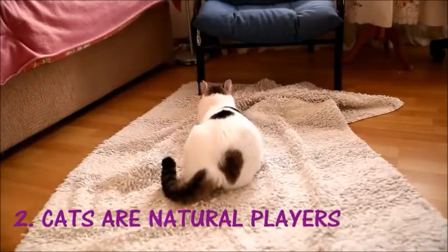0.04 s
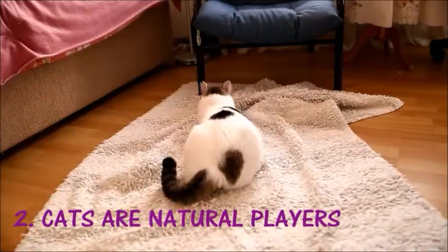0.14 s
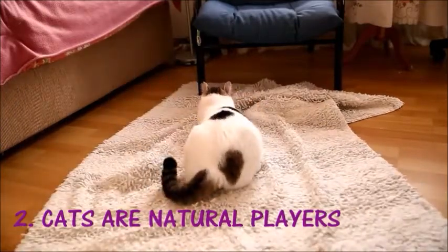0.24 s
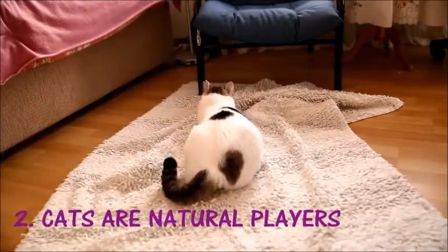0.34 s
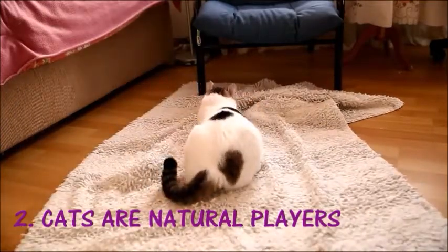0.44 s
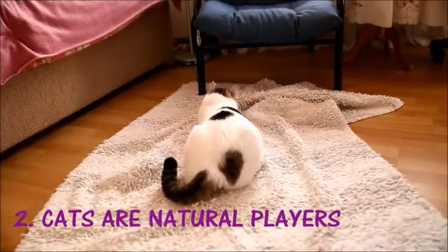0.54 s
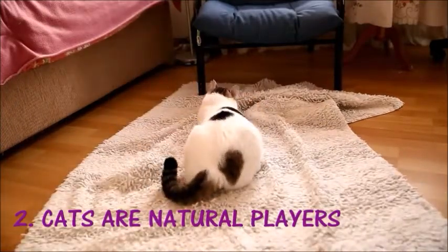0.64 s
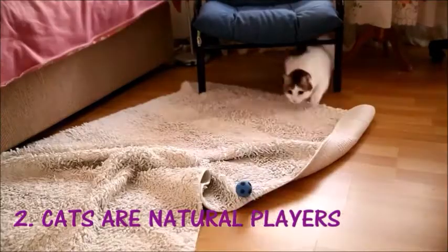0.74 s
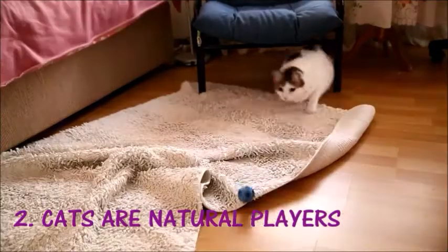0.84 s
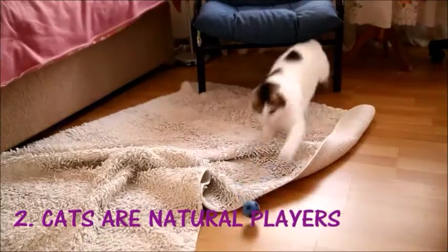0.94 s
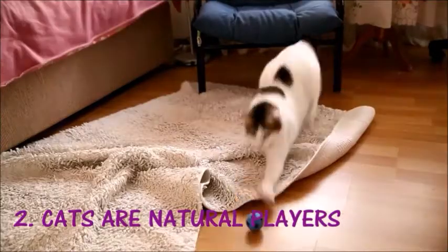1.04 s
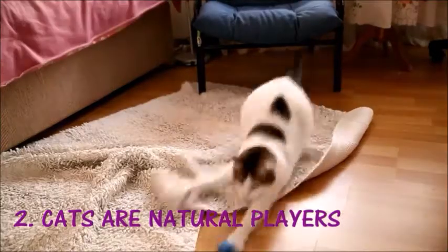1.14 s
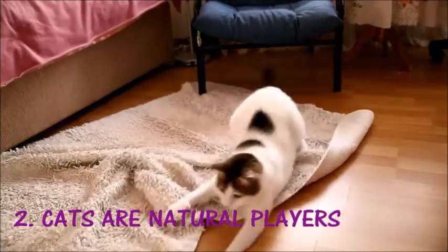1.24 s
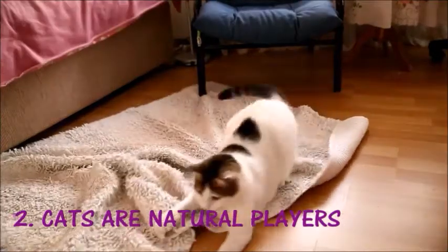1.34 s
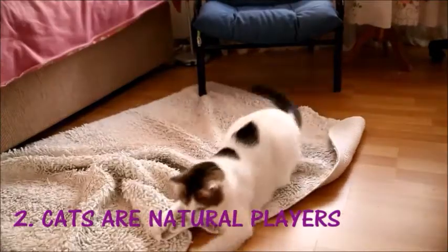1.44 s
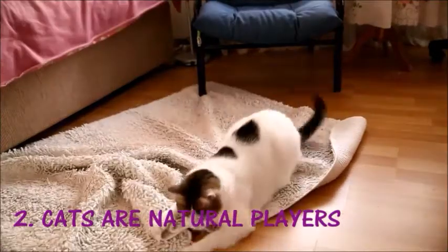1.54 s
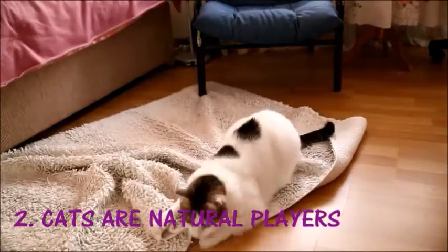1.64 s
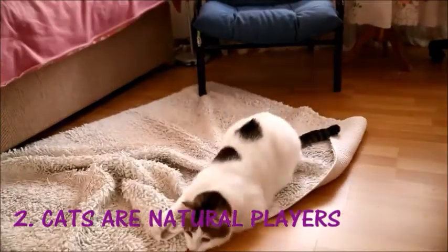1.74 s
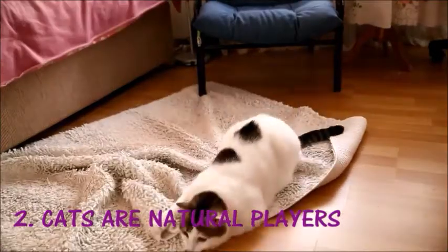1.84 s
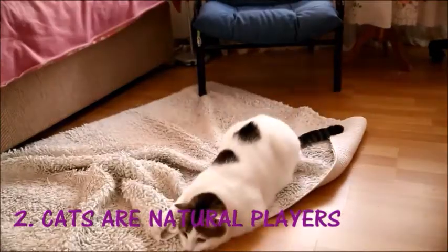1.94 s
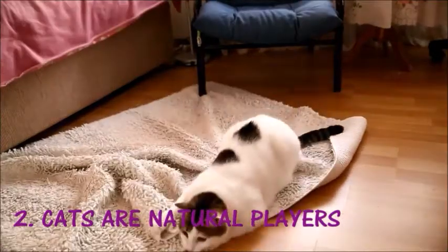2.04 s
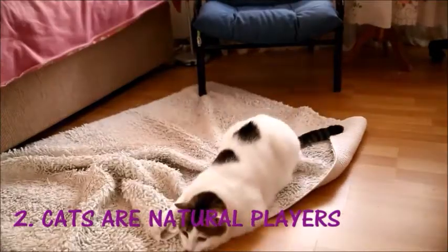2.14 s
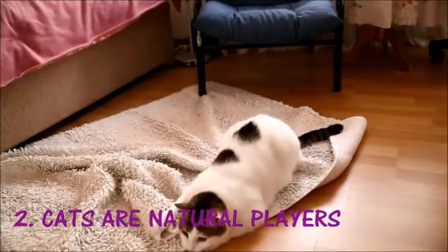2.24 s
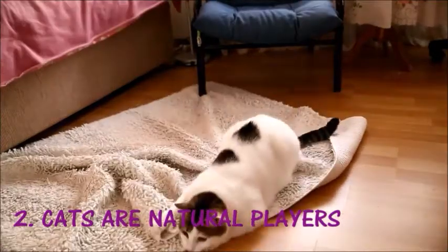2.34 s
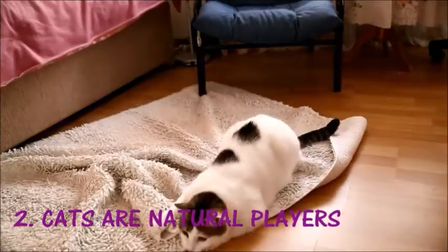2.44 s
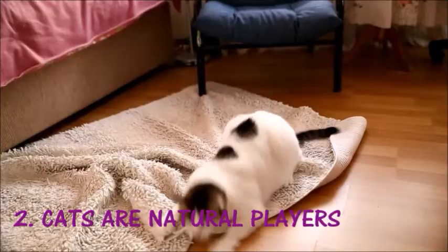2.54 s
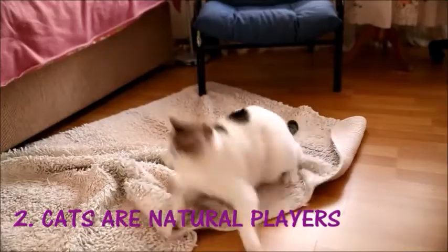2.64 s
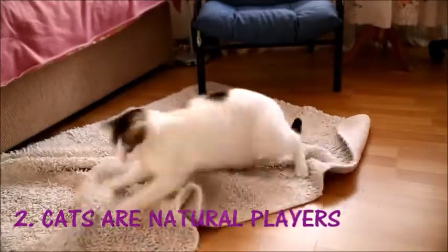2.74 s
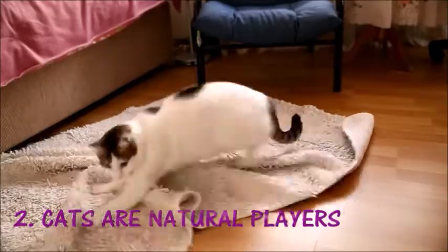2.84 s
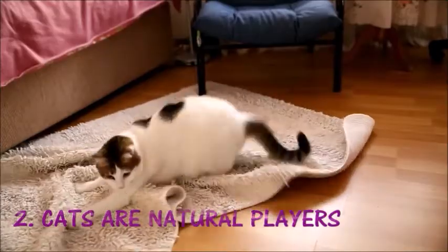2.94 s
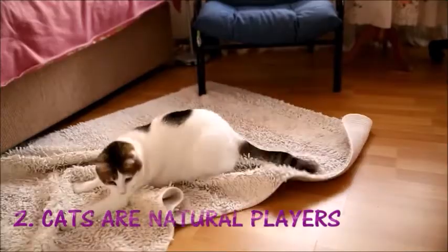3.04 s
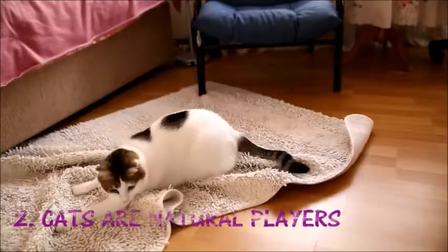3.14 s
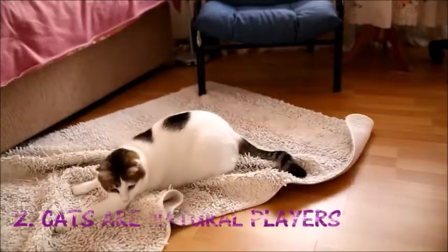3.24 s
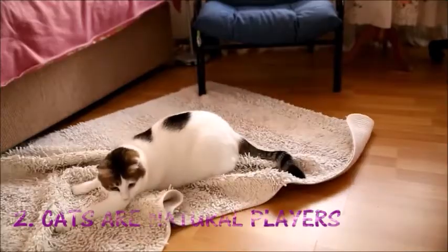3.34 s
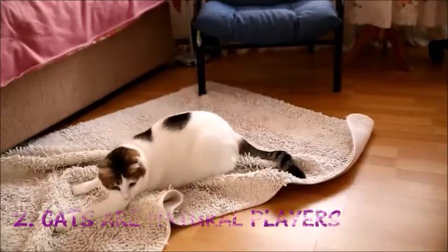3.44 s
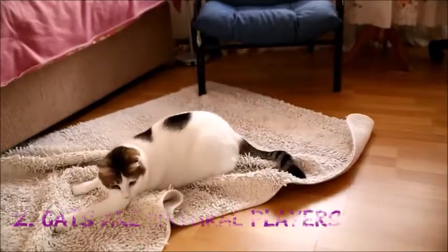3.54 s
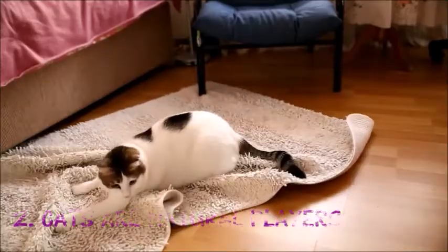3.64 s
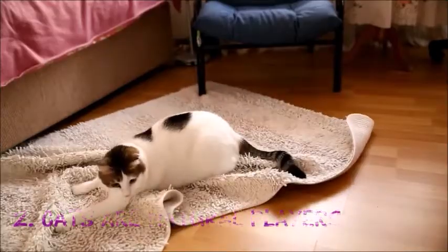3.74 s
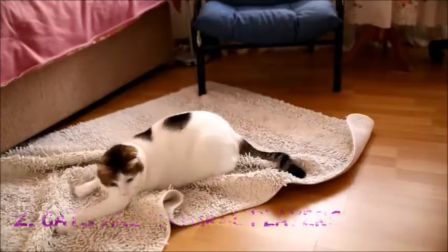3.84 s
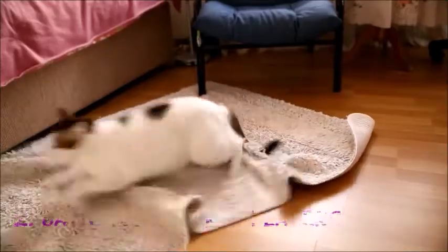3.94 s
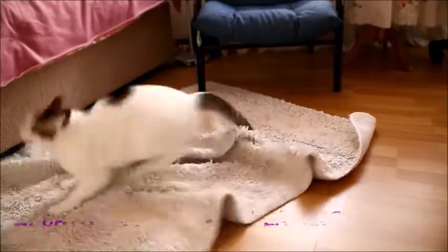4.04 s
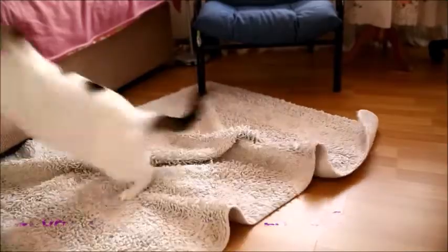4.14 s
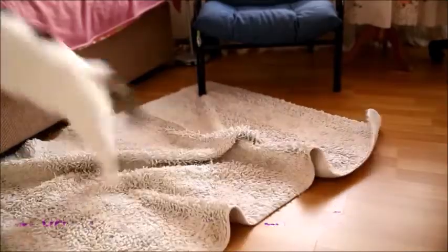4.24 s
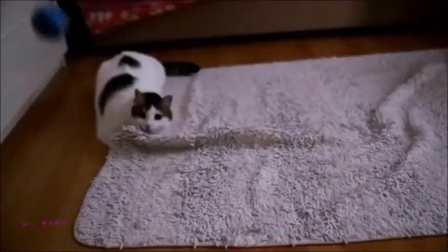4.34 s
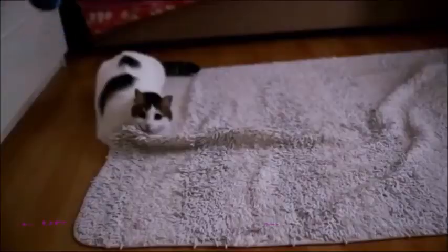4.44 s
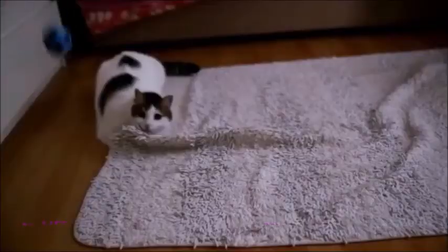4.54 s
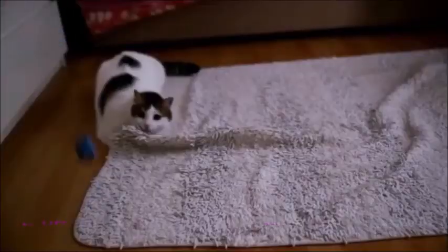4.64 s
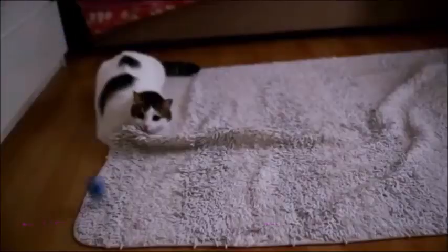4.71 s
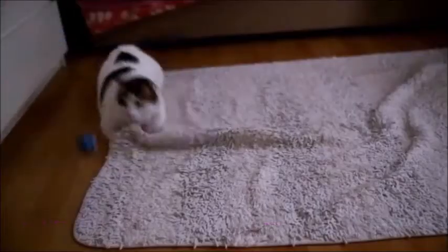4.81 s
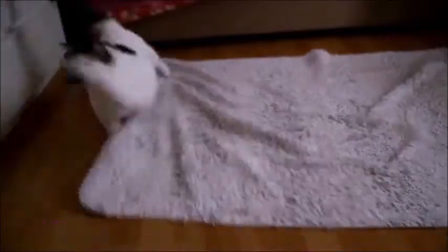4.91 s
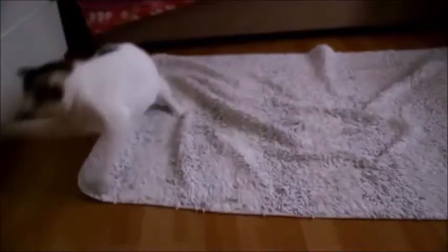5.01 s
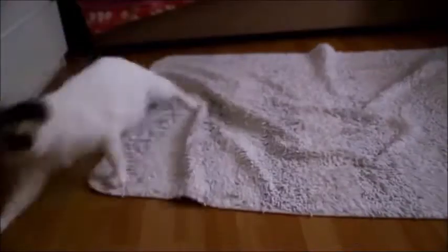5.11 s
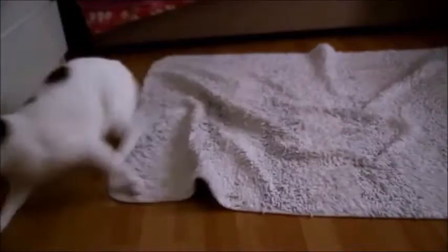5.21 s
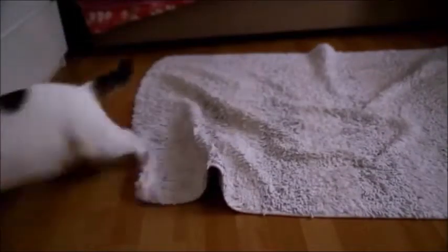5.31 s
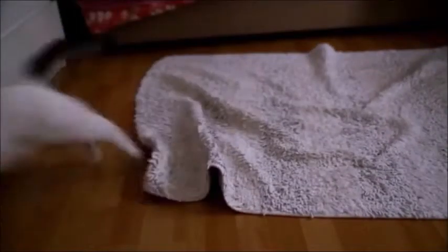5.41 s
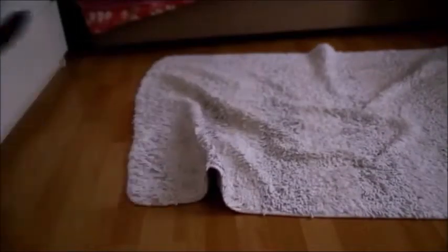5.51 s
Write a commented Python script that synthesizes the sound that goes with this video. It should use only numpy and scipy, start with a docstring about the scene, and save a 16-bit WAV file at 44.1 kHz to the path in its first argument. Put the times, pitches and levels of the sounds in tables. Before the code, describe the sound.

Light paw thuds and the rustle of a rug come from straight ahead as a cat leaps and scrabbles over a wooden floor. The movement thins out to a few steps, leaving a soft whir in the small room. Then the cat scrambles harder, its claws ripping at the pile and the rug sliding in quick swishes, ending with louder, ringing knocks on the boards.

```python
"""A cat pounces about on a shaggy rug over a wooden floor. Its paws thump the boards and set them
ringing, its claws tick, snag and zip in the pile, and the rug swishes as it is dragged and bunched.
A small room answers each step over a soft steady whir. The opening leap plays a second time,
set between two short silences. From 4.25 s all the cat's sounds are thinner, with less bass."""
import sys
import numpy as np
from scipy import signal
from scipy.fft import rfft, irfft, next_fast_len
from scipy.io import wavfile
from scipy.ndimage import uniform_filter1d, map_coordinates

SR = 44100
rng = np.random.default_rng(int(sys.argv[2]) if len(sys.argv) > 2 else 0)


def to_wav(s):
    """Save 16-bit WAV."""
    ch = np.atleast_2d(s).T  # columns
    pcm = np.round(np.clip(ch, -1, 1) * 32767)  # PCM
    wavfile.write(sys.argv[1], SR, pcm.astype(np.int16))


N = 245592
TIME = np.arange(N) / SR
AGE = np.arange(16384) / SR  # seconds since a blow

# The landings. Each row: start in seconds, board level in dB, board pitch in Hz, then thud, toes and
# room send in dB against the board (thud and toes before footfall's trims), and number of paws.
LANDINGS = [(0.4724, -41, 323, 0.5, 3, 3, 1), (0.5613, -34, 446, -14, -12, 3.5, 2),
            (0.8169, -39.5, 513, 1, -6, 6, 1), (0.865, -42, 340, -5, -3.5, 2.5, 2),
            (0.984, -40.5, 404, 0, -4, 4, 1), (1.062, -47, 520, -2.5, -6, 4.5, 1),
            (1.1711, -32, 550, -13, -10, 0.5, 1), (1.319, -38, 613, -18, -15, -3.5, 1),
            (1.3938, -34.5, 442, -22, -21, -3.5, 1), (1.439, -42, 445, -4, -14, 2.5, 1),
            (1.574, -44, 477, 4, -1, 5.5, 2), (1.673, -47.5, 416, -11, -2.5, 6, 1),
            (1.776, -41.5, 310, -15, -16, 1, 1), (1.827, -35.5, 537, -3.5, -6.5, 1, 1),
            (3.695, -34, 530, -15.5, -12.5, -4, 1), (3.698, -40, 164, -11, -31, -8, 1),
            (4.3382, -39, 630, -4, -3, 1, 1), (4.496, -42.5, 500, 3.5, -5, 8, 1),
            (4.599, -23.5, 596, -24, -2.5, 0.5, 3), (4.7082, -18.5, 650, -26, -8, 0.5, 1),
            (4.815, -23, 617, -27, -8, -1.5, 2), (5.009, -32, 492, 1.5, -7.5, 5, 1),
            (5.068, -32.5, 800, -22, 8.5, 8, 1), (5.1321, -25.5, 540, -10, -11, -0.5, 1),
            (5.298, -44, 503, 10.5, -12, 5, 1), (5.357, -24, 594, -6.5, -7, 2.5, 2),
            (5.437, -17.5, 585, -19, -29, -2.5, 1), (5.537, -21.5, 530, 1, -19, 5, 1),
            (5.546, -14, 545, -22, -33, 0.5, 1)]
# The boards ring longer as the cat nears the rug's edge and leaves it.
# Each row: time in seconds, decay in cycles.
BOARD_RING = [(3.7, 0.43), (4.6, 0.72), (5.15, 0.75), (5.36, 1.78), (5.55, 2.0)]


def paws(gap_s=0.0145, softer_db=-1, pitch_ratio=0.95, softer_toes_db=-5):
    """The paws of a landing come down in turn, each softer and lower; the rug damps the boards."""
    out = np.zeros(N)
    for start, db, hz, thud, toes, wet, count in LANDINGS:
        ring = np.interp(start, *np.transpose(BOARD_RING))
        for k in range(round(count)):
            step = footfall(hz * pitch_ratio ** k, ring, thud, toes + k * softer_toes_db, wet)
            add(out, start + k * gap_s, amp(db + k * softer_db) * step)
    return out


# The tone of a paw's dull push, its toe scuff and a claw. Each row: frequency in Hz, gain in dB.
PUSH_EQ = [(30, -32.5), (70, -5.5), (150, 6.5), (260, 1.5), (500, -6.5), (1500, -55)]
SCUFF_EQ = [(200, -50), (600, 4.5), (950, 4), (1350, 5.5), (1900, -8), (3000, -10), (8000, -103)]
CLAW_EQ = [(400, -70), (1400, 4), (2200, 7.5), (3200, 4.5), (4200, 1), (5200, -17), (6500, -16),
           (10000, -16), (16000, -36)]


def footfall(hz, ring, thud_db, toes_db, wet_db, firm_db=-6):
    """One paw sets a board ringing; its weight thuds, and its toes add a knock, a scuff and a tick."""
    tail = room_tail()
    board = in_room(board_mode(hz, ring), tail, wet_db)
    thud_hz = 249 - 0.5 * thud_db  # the floor's lower mode sinks under a heavier step
    thud = in_room(board_mode(thud_hz, ring=0.63), tail, wet_db=-1.5)
    push = in_room(struck(np.exp(-AGE / 0.00011), PUSH_EQ), room_tail(), wet_db=-1.5)
    knock_hz = 935 + 26.5 * max(toes_db - firm_db, 0)  # firm toes knock higher
    knock = in_room(board_mode(knock_hz, ring=1.96), tail, wet_db=-4)
    scuff = slips(SCUFF_EQ, decay_s=0.0008, wet_db=-2, rise_s=0.00044)
    tick = slips(CLAW_EQ, decay_s=0.00053, wet_db=-2)
    weight = amp(-1) * thud + amp(-6) * push
    toes = amp(-2) * knock + amp(-4) * scuff + amp(-16) * tick
    return board + amp(thud_db) * weight + amp(toes_db) * toes


def board_mode(hz, ring, pad_s=0.001):
    """A board loaded by a soft pad swells, then dies with a time constant of ring cycles."""
    cycles = hz * AGE
    loading = 1 - np.exp(-(AGE / pad_s) ** 2)
    return -cycles * np.exp(-cycles / ring) * loading * np.sin(2 * np.pi * cycles)


def slips(eq, decay_s, wet_db, rise_s=0.0019):
    """Tiny slips build up as a toe or claw bites and quickly die, with their reverb."""
    bite = 1 - np.exp(-(AGE / rise_s) ** 2)
    force = rng.standard_normal(len(AGE)) * bite * np.exp(-AGE / decay_s)
    return blow(struck(force, eq)) + amp(wet_db) * blow(struck(room_tail(), eq))


# Claws catching in the pile. Each row: start in seconds, then rip and zing in dB before their trims.
SNAGS = [(0.4727, -45.5, -74), (0.7373, -45, -44), (0.993, -41.5, -63), (1.674, -51.5, -70),
         (3.694, -43, -55.5), (4.351, -34.5, -30.5), (4.4386, -39, -37), (4.4584, -53, -40),
         (4.6007, -50, -37), (4.6486, -33.5, -37), (4.7059, -25.5, -38), (4.873, -44, -38),
         (4.8896, -35, -43), (5.0076, -32.5, -41), (5.0673, -24, -33), (5.3565, -25, -35)]
# The bright tone of the release. Each row: frequency in Hz, gain in dB.
ZING_EQ = [(2000, -53), (4500, 10), (6500, 4.5), (8000, 6), (9800, 0.5), (11000, -22), (12500, -54),
           (16000, -88)]


def claw_snags(rip_trim_db=-4, zing_trim_db=-3, decay_s=0.003, wet_db=-4):
    """A claw plucks a loop of pile and lets it go with a rip and a bright zing."""
    out = np.zeros(N)
    for start, rip_db, zing_db in SNAGS:
        rip = amp(rip_db + rip_trim_db) * slips(CLAW_EQ, decay_s, wet_db)
        zing = amp(zing_db + zing_trim_db) * slips(ZING_EQ, decay_s, wet_db)
        add(out, start, rip + zing)
    return out


# Claws skating over the weave.
# Each row: centre in seconds, half width in seconds, pitch in Hz, level in dB.
ZIPS = [(.728, 0.0026, 2670, -43.5), (.729, 0.0069, 8700, -47), (4.617, 0.0072, 8400, -32.5),
        (4.873, 0.0041, 9440, -35), (4.893, 0.0035, 9000, -31.5), (4.992, 0.011, 9300, -34.5),
        (5.278, 0.0057, 8160, -41)]


def claw_zips(waver=0.0481, flutter_db=6, wet_db=-8):
    """A claw drawn fast over the threads ticks at an unsteady rate high enough to squeak."""
    out, middle = np.zeros(N), AGE.mean()
    for centre, half_width, hz, db in ZIPS:
        phase = 2 * np.pi * np.cumsum(hz * (1 + waver * wobble(2500, AGE))) / SR
        swell = np.exp(-((AGE - middle) / half_width) ** 2 / 2)
        level = amp(db - flutter_db * wobble(594, AGE))
        add(out, centre - middle, level * swell * np.sin(phase))
    return out + amp(wet_db) * signal.fftconvolve(out, room_tail())[:N]


# Shoves that slide the rug.
# Each row: peak in seconds, rise in seconds, then rustle and hiss in dB before their trims.
SHOVES = [(.44, 0.028, -65, -71), (.63, 0.11, -57, -61), (0.737, 0.035, -45, -50.5),
          (.95, 0.11, -54.5, -53.5), (1.01, 0.021, -44.5, -54), (1.209, 0.076, -55.5, -55.5),
          (1.38, 0.096, -57, -59), (1.549, 0.13, -52, -52), (1.829, 0.11, -55, -57),
          (2.009, 0.027, -67, -66.5), (4.385, .025, -40.5, -43), (4.458, 0.067, -37.5, -42),
          (4.629, 0.022, -33.5, -34), (4.725, 0.013, -38.5, -49), (4.81, 0.11, -58, -50.5),
          (4.899, 0.016, -34, -30), (4.94, 0.045, -37.5, -40), (5, 0.022, -50, -34),
          (5.203, 0.037, -40, -39.5), (5.278, 0.014, -42, -39), (5.083, 0.007, -36, -53),
          (5.38, 0.017, -32.5, -52), (5.455, .035, -41.5, -45), (5.539, 0.011, -36, -47)]
# The tone of the pile and of the backing. Each row: frequency in Hz, gain in dB.
RUSTLE_EQ = [(30, -6), (80, -0.5), (200, -10.5), (550, 6.5), (900, 7), (1400, 1), (2000, 0), (3200, 1),
             (4800, -6.5), (7000, -14), (10000, -51), (16000, -54)]
HISS_EQ = [(1500, -31), (4000, 3), (6300, -0.5), (8000, 3), (9200, 1.5), (10300, 0), (11500, -5),
           (13000, -13.5), (15500, -23)]


def rug(rustle_trim_db=1, hiss_trim_db=-1, grip_db=1.86, wet_db=-6):
    """With each shove the pile rustles and the backing hisses over the boards, gripping unevenly."""
    # the pile settles after the backing has stopped
    rustle = np.sqrt(sum((amp(db) * slide(s, rise, fall_ratio=1.13)) ** 2 for s, rise, db, _ in SHOVES))
    hiss = np.sqrt(sum((amp(db) * slide(s, rise, fall_ratio=0.86)) ** 2 for s, rise, _, db in SHOVES))
    grip = amp(grip_db * wobble(70))
    pile = coloured(folds(fibres(per_s=3000, spread_db=1.83, rub=1), depth_db=2), RUSTLE_EQ)
    backing = coloured(folds(fibres(per_s=4000, spread_db=1.8, rub=2), depth_db=2.5), HISS_EQ)
    swish = grip * (amp(rustle_trim_db) * rustle * pile + amp(hiss_trim_db) * hiss * backing)
    return swish + amp(wet_db) * signal.fftconvolve(swish, room_tail())[:N]


def slide(peak_s, rise_s, fall_ratio, shape=1.71):
    """The rug's speed in one shove swells and dies away; shape 1 is pointed, 2 is round."""
    span = rise_s * np.where(TIME < peak_s, 1, fall_ratio)
    return np.exp(-np.minimum(np.abs((TIME - peak_s) / span) ** shape, 20))


def fibres(per_s, spread_db, rub):
    """Tufts flick free at random, some harder than others, over an even rub."""
    flicks = (rng.random(N) < per_s / SR) * rng.standard_normal(N)
    flicks *= amp(spread_db * np.clip(rng.standard_normal(N), -2, 2))
    return unit(flicks) + rub * rng.standard_normal(N)


def folds(rub, depth_db):
    """Folds open and close, so the colour of the rub keeps shifting."""
    bands = signal.stft(rub, nperseg=256)[2]
    patches = uniform_filter1d(rng.standard_normal(bands.shape), size=5, axis=0)
    patches = uniform_filter1d(patches, size=5, axis=1)
    return signal.istft(bands * amp(depth_db * unit(patches)), nperseg=256)[1][:N]


# The small room's decay. Each row: frequency in Hz, seconds to fall by 60 dB.
ROOM_DECAY = [(100, 0.77), (260, 0.41), (600, 0.29), (1800, 0.42), (5000, 0.38), (12000, 0.13)]
# Its standing waves. Each row: centre in Hz, width in Hz, added resonance in dB.
STANDING_WAVES = [(160, 24, -10), (304.3, 34, 6.5), (464, 27, -0.5), (549, 10, 1)]


def room_tail(gap_s=0.0046, build_s=0.0021):
    """The room answers after a short gap, favours its standing waves and loses its top first."""
    hz, t, bands = signal.stft(rng.standard_normal(len(AGE)), SR, nperseg=256)
    decay = amp(-60 * t / along(ROOM_DECAY, hz)[:, None])
    tail = signal.istft(bands * decay, SR, nperseg=256)[1][:len(AGE)]
    tail *= np.clip((AGE - gap_s) / build_s, 0, 1)
    f = np.fft.rfftfreq(len(AGE), 1 / SR)
    resonance = sum(amp(db) * 1j * f * width / (centre ** 2 - f ** 2 + 1j * f * width)
                    for centre, width, db in STANDING_WAVES)
    tail = irfft(rfft(tail) * (1 + resonance))
    return tail / np.linalg.norm(tail)


def in_room(hit, tail, wet_db):
    """A blow followed by its reverb."""
    return blow(hit) + amp(wet_db) * blow(signal.fftconvolve(hit, tail)[:len(hit)])


# Stereo width, opening toward the top. Each row: frequency in Hz, side against middle in dB.
WIDTH = [(1500, -79), (3000, -52.5), (5000, -25), (8000, -18), (12000, -7), (15000, 4)]


def stereo_scatter(middle, span_s=0.0025):
    """Near surfaces scatter the treble a little differently to each side."""
    scatter = rng.standard_normal(len(AGE)) * AGE * np.exp(-AGE / span_s)
    side = signal.fftconvolve(middle, scatter / np.linalg.norm(scatter))[:N]
    side = equalised(side, WIDTH)
    return np.array([middle + side, middle - side])


# The dark bed of room tone. Each row: frequency in Hz, gain in dB.
ROOM_TONE_EQ = [(20, -19), (49, -4.5), (120, -7.5), (250, -5.5), (360, -9.5), (560, -7), (690, -7),
                (820, -5.5), (1150, -14), (2000, -18), (4300, -23), (5300, -30), (9000, -33), (12500, -29),
                (15600, -37)]
# The whir. Each row: centre in Hz, width in Hz, rms level in dB.
WHIR_BANDS = [(574, 33, -67.5), (779, 26, -67), (851, 34, -67.5)]


def room_tone(level_db=-60, air_db=-81):
    """Steady room noise with narrow whirring bands and a faint, wide hiss."""
    bed = amp(level_db) * coloured(rng.standard_normal(N), ROOM_TONE_EQ)
    for centre, width, db in WHIR_BANDS:
        whir = filtered(rng.standard_normal(N), lambda hz: 1 / (1 + ((hz - centre) / width * 2) ** 2))
        bed += amp(db) * unit(whir)
    air_eq = [(2000, -48), (5000, -24.5), (8000, -2), (12500, 1), (16000, 1)]
    air = coloured(rng.standard_normal(N), air_eq)
    return bed + amp(air_db) * np.array([air, -air])


def amp(db):
    """Decibels to gain."""
    return 10 ** (np.asarray(db) / 20)


def unit(x):
    """x at rms 1."""
    return x / np.sqrt(np.mean(x ** 2) + 1e-20)


def blow(x, contact_s=0.012):
    """A short sound scaled to the energy of rms 1 over one contact."""
    return x * np.sqrt(contact_s * SR / np.sum(x ** 2))


def along(points, hz):
    """(Hz, value) points read on a log axis."""
    freqs, values = np.transpose(points)
    return np.interp(np.log(hz + 1), np.log(freqs + 1), values)


def filtered(x, response):
    """x through a gain that depends on frequency."""
    size = next_fast_len(N + SR // 2)
    return irfft(rfft(x, size) * response(np.fft.rfftfreq(size, 1 / SR)), size)[..., :N]


def equalised(x, eq):
    """x through a curve of (Hz, dB) points."""
    return filtered(x, lambda hz: amp(along(eq, hz)))


def coloured(noise, eq):
    """Noise shaped by an EQ curve, at rms 1."""
    return unit(equalised(noise, eq))


def struck(force, eq, size=4096):
    """A force through an EQ curve, at minimum phase so that nothing rings early."""
    cepstrum = irfft(np.log(amp(along(eq, np.fft.rfftfreq(size, 1 / SR)))))
    cepstrum[1:size // 2] *= 2
    cepstrum[size // 2 + 1:] = 0
    return signal.fftconvolve(force, irfft(np.exp(rfft(cepstrum))))[:len(force)]


def wobble(rate, t=TIME):
    """A smooth random curve over the times t, rate knots a second."""
    return map_coordinates(rng.standard_normal(int(t[-1] * rate) + 4), [t * rate])


def add(track, start_s, sound):
    """Mix a sound into the track."""
    part = track[round(start_s * SR):][:len(sound)]
    part += sound[:len(part)]


# The thinner tone of the cat's later sounds. Each row: frequency in Hz, gain in dB.
THIN_BASS_EQ = [(30, -5), (70, -11), (130, -5.5), (220, -4), (16000, 1.5)]


def scene(leap_end_s=0.862, leap_again_s=2.1337, thinner_from_s=4.25):
    """The cat straight ahead; its first leap comes twice, and later all its sounds have less bass."""
    cat = paws() + claw_snags() + claw_zips() + rug()
    add(cat, leap_again_s, cat[:round(leap_end_s * SR)].copy())
    later = TIME > thinner_from_s
    cat = cat * ~later + struck(cat * later, THIN_BASS_EQ)
    return stereo_scatter(cat) + room_tone()


# A small microphone's tone. Each row: frequency in Hz, gain in dB.
MICROPHONE_EQ = [(15, -18), (28, -24), (45, 0.5), (13500, -1.5), (15700, -7)]
# Hard mutes around the repeated leap. Each row: start in seconds, end in seconds.
SILENCES = [(2.0273, 2.0604), (2.9949, 3.0283)]


def record(dry, top_hz=15700):
    """A small microphone rolls off both extremes; the sound drops out twice and is cut above top_hz."""
    heard = equalised(dry, MICROPHONE_EQ)
    for start, end in SILENCES:
        heard[:, (TIME > start) & (TIME < end)] = 0
    return filtered(heard, lambda hz: hz < top_hz)


dry = scene()
out = record(dry)
to_wav(out)
```